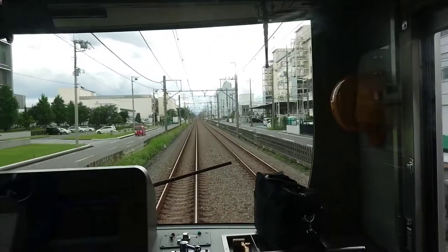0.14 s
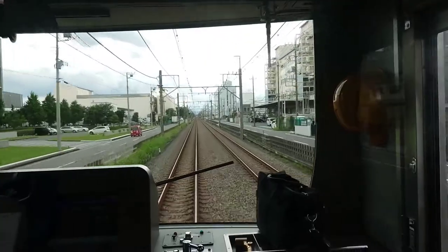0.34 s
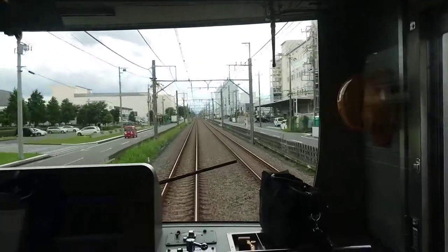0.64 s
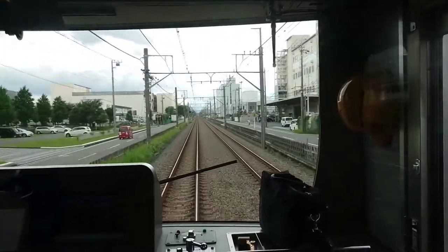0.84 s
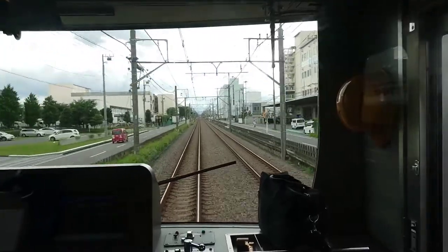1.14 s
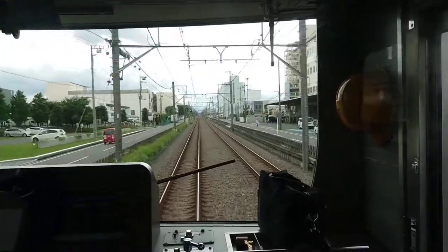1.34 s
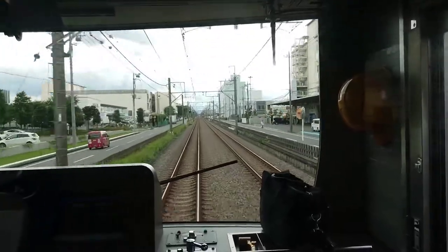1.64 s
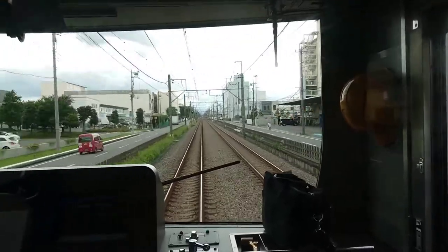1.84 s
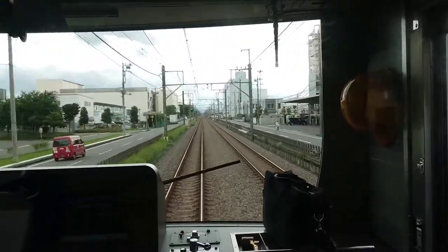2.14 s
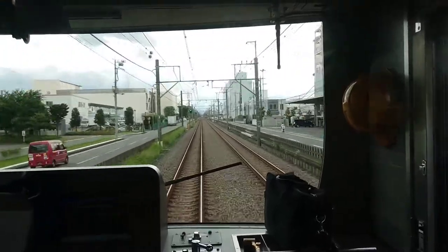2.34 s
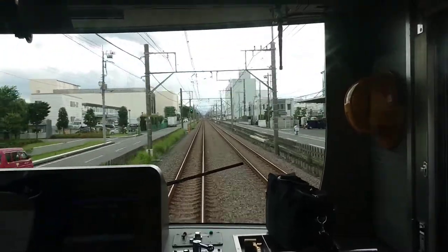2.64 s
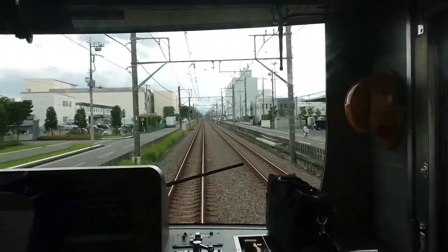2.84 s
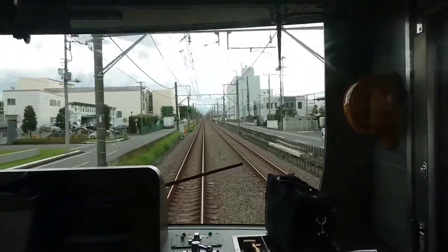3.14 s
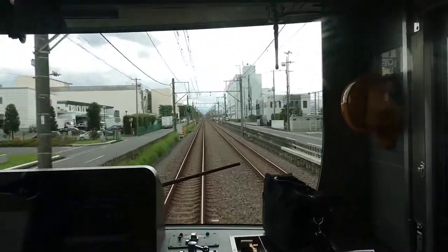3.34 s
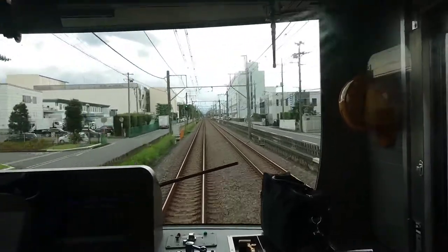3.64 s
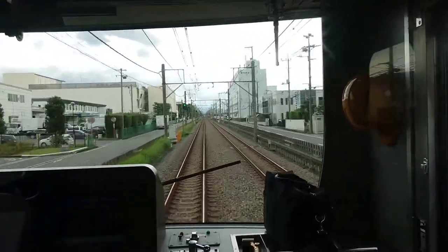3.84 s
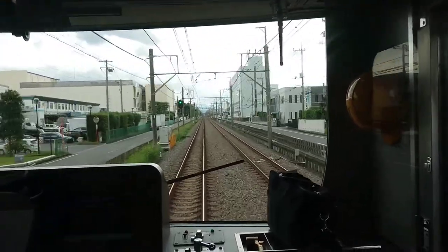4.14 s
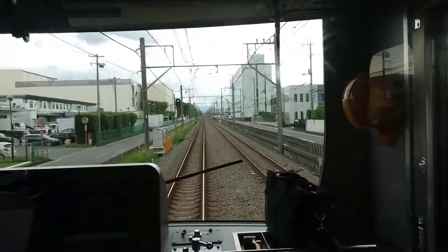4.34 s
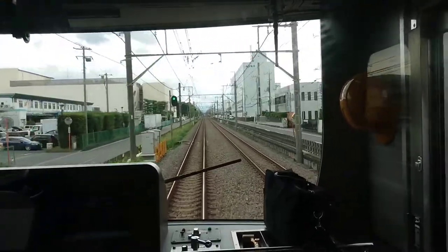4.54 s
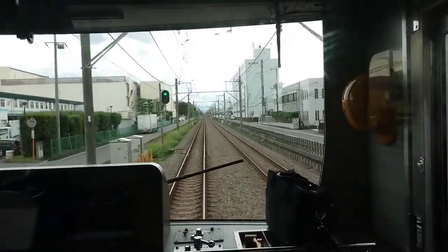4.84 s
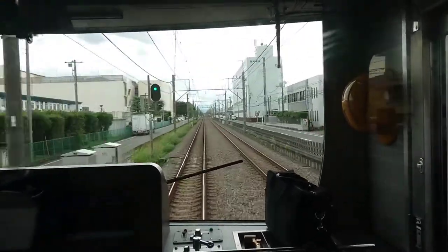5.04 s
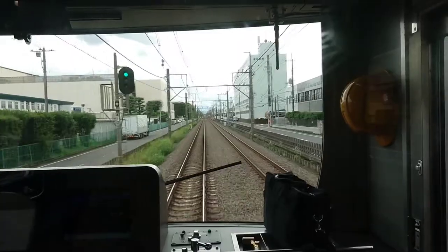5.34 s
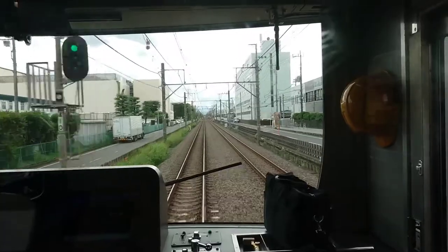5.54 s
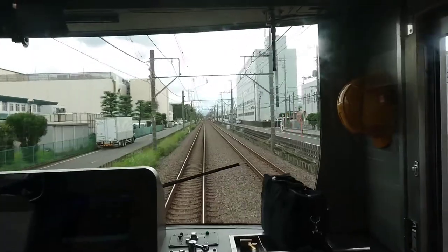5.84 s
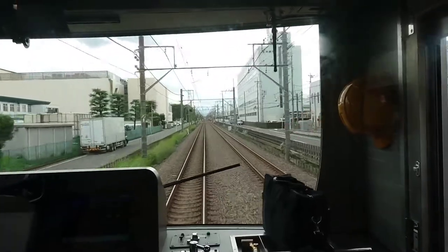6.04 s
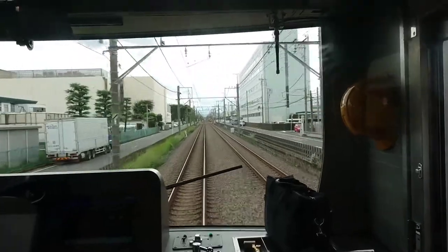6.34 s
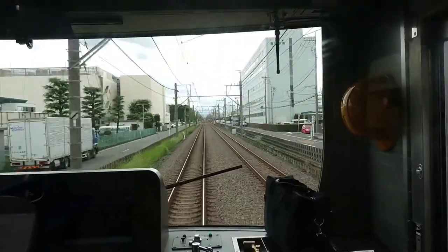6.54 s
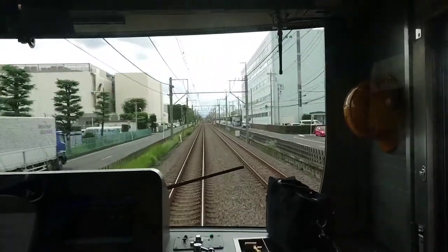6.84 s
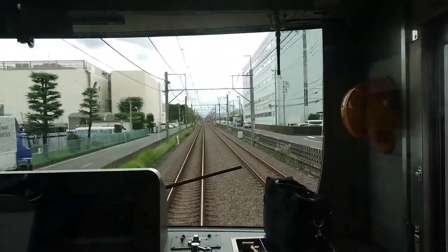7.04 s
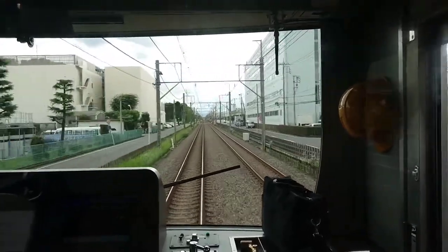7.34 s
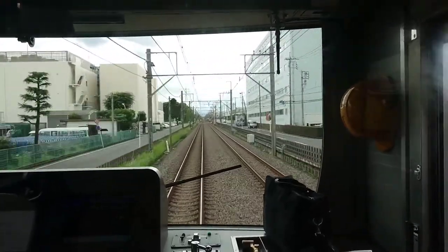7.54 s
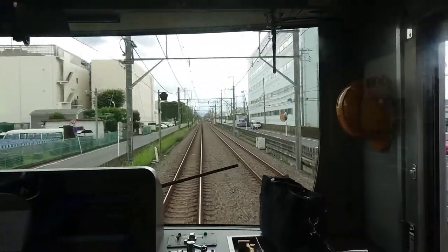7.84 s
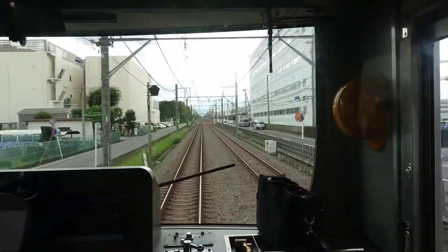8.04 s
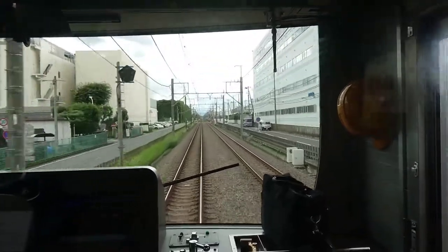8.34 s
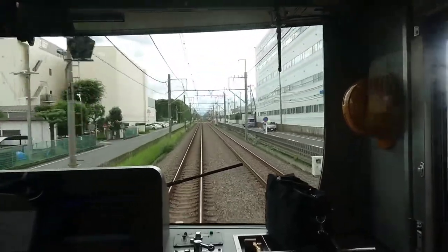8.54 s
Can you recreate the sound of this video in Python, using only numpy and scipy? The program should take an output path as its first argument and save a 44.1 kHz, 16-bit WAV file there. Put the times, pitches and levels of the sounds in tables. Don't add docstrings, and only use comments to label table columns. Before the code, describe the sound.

Low rumbling train ride heard from the driver's cab: floor thumps, a hard clattering jolt early on, thin whine and tiny squeaks behind.

```python
import sys
import numpy as np
from scipy import signal
from scipy.fft import rfft, irfft
from scipy.io import wavfile
from scipy.ndimage import uniform_filter1d

SR = 44100
rng = np.random.default_rng(int(sys.argv[2]) if len(sys.argv) > 2 else 0)


def volts_from_db(level):
    exponent = np.asarray(level, float) / 20
    return 10 ** exponent


def persist_wave(psi):
    counts = np.round(np.clip(psi, -1, 1) * 32767).astype(np.int16)
    wavfile.write(sys.argv[1], SR, np.atleast_2d(counts).T)


N = 382788
HZ = np.maximum(np.fft.rfftfreq(N, 1 / SR), 1)


def rms_one(x):
    return x / np.sqrt(np.mean(x ** 2) + 1e-20)


def in_time(rows):
    s, *columns = np.transpose(rows)
    return np.array([np.interp(np.arange(N) / SR, s, c) for c in columns])


def at_hz(points):
    hz, value = np.transpose(points)
    return np.interp(np.log(HZ), np.log(hz), value)


def hump(hz, width):
    return 1 / (1 + (2 * (HZ - hz) / width) ** 2)


def drift(rate):
    r = np.exp(-80 * np.pi * rate / SR)
    sparse = rng.standard_normal(N // 40 + 2002)
    slow = signal.lfilter([1], [1, -2 * r, r * r], sparse)[2000:]
    return np.interp(np.arange(N) / 40, np.arange(len(slow)), rms_one(slow))


def evened(x, span_s, share):
    power = uniform_filter1d(np.mean(x ** 2, axis=0), round(span_s * SR), mode="wrap")
    return x * (power / np.mean(power) + 0.039) ** (-np.clip(share, 0, 1) / 2)


def swells(rest_db, s, peak_db, length_s):
    t = np.arange(0, N + 64, 64) / SR
    length_s = np.reshape(length_s, (-1, 1))
    bells = volts_from_db(peak_db) ** 2 @ np.exp(-8 * ((t - s[:, None]) / length_s) ** 2)
    return 10 * np.log10(volts_from_db(rest_db) ** 2 + np.interp(np.arange(N) / SR, t, bells))


def add(power, s, db, t60, rise_s):
    start = round(s * SR)
    t = np.arange(min(SR, N - start)) / SR
    power[start:][:len(t)] += (volts_from_db(db - 60 * t / t60) * (1 - np.exp(-t / rise_s))) ** 2


# frequency in Hz, left-right correlation.
LIKENESS = [(25, .985), (50, 1), (130, 0.98), (210, 0.96), (330, 0.81), (500, 0.56), (770, 0.6),
            (1170, 0.15), (1790, -0.31), (2700, -0.012), (4000, -0.049)]


def diffuse():
    mid, side = rfft(rng.standard_normal((2, N)))
    alike = np.clip(at_hz(LIKENESS), -1, 1)
    return np.sqrt(1 + alike) * mid + np.sqrt(1 - alike) * side * np.array([[1], [-1]])


ZONE_HZ = [
    75,
    260,
    750,
    2500,
]
# frequency in Hz, level in dB per Hz.
ROLLING = [(20, -30), (32, -15.5), (48, -3), (65, 0.5), (99, -3.5), (172, -14.5), (282, -17.5),
           (434, -25.5), (533, -24.5), (668, -30), (1010, -31), (1520, -34.5), (2340, -35.5), (3200, -38.5),
           (10000, -41.5), (16000, -49.5)]
# frequency in Hz, width in Hz, lift in dB.
FLOOR_MODES = [(64.6, 13.6, 3.5), (144, 21, 2.5), (211, 30, 2.5), (256, 20, 2.5), (280.4, 16.4, 3.5),
               (350, 14, 2)]


def rolling(patchy_db):
    loads = body_loads()
    loads = loads - np.median(loads, axis=1, keepdims=True)
    slow = uniform_filter1d(loads, round(.3 * SR), axis=1)
    modes_db = sum(lift_db * hump(hz, width) for hz, width, lift_db in FLOOR_MODES)
    field = diffuse() * volts_from_db(at_hz(ROLLING) + modes_db)
    field = field / np.sqrt(np.mean(irfft(field, N) ** 2))
    out, together = 0, drift(9)
    octaves = np.log2(np.clip(HZ, 45, 11520))
    for hz in 45 * 2 ** np.arange(0, 8.1, 2 / 3):
        slice_shape = np.clip(1 - 1.5 * np.abs(octaves - np.log2(hz)), 0, 1)
        piece = irfft(field * slice_shape, N)
        if hz < 400:
            piece = evened(piece, span_s=0.06, share=0.26)
        shares = np.array([np.interp(np.log(hz), np.log(ZONE_HZ), row) for row in np.eye(4)])
        reach = shares.max() ** 2.3 * min(hz / 70, 1) ** 2
        surge_db = reach * (shares @ loads - shares @ slow)
        flutter_db = patchy_db * (drift(9.5) + .5 * together)
        slow_db = min(hz / 60, 1) ** 2 * shares @ slow
        out = out + volts_from_db(slow_db + surge_db + flutter_db) * piece
    return volts_from_db(-19.5) * out


# time in seconds, rail roughness in dB, sway of the car on its springs in dB.
TRACK = [(0, -41, 1), (.36, -37, -1), (.58, -42.5, 0.5), (1.06, -40.5, -0.5), (1.4, -37.5, -0.5),
         (1.84, -40, -1), (2.47, -36, -2), (3.22, -39.5, 3.5), (3.55, -40.5, 3), (3.89, -33.5, 4),
         (4.3, -40, 3), (5.49, -40.5, 1.5), (5.95, -41.5, -1), (6.5, -43, -1.5), (7.6, -43.5, -1.5),
         (8.0, -43, 2), (8.34, -41, 0.5), (8.68, -45, -1)]


def roughness():
    db = in_time(TRACK)[0]
    return db - np.median(db)


FOLLOWS = [
    0.34,
    0.75,
    0.43,
    0.87,
]
SWAYS = [
    1.13,
    0.15,
    0.18,
    .05,
]
# time in seconds, peak in dB, length in seconds.
BOUNCES = [(0.0, -14.5, 0.052), (0.255, -18.5, 0.16), (0.514, -18, 0.16), (0.96, -16.5, 0.13),
           (1.158, -18, 0.096), (1.256, -18, 0.077), (1.37, -21, 0.07), (1.515, -22, 0.077),
           (1.81, -22.5, 0.11), (2.006, -18.5, 0.1), (2.223, -18.5, 0.056), (2.45, -21, .1),
           (2.52, -19, 0.11), (2.727, -18, 0.046), (2.957, -24, 0.43), (3.595, -25, 0.18), (3.82, -29, .18),
           (3.935, -17, 0.084), (4.14, -14.5, 0.079), (4.372, -17.5, 0.19), (4.828, -25, 0.15),
           (4.98, -12, 0.033), (5.39, -11, 0.058), (6.043, -19, 0.12), (5.547, -25, 0.12),
           (6.404, -19, 0.14), (6.826, -20, 0.23), (7.24, -24, 0.64), (8.147, -18.5, 0.098),
           (8.587, -18, 0.13)]
# time in seconds, peak in dB.
FLEXES = [(.02, -23), (.3, -40), (.46, -24), (.8, -25), (1.06, -28), (1.24, -21.5), (1.37, -27),
          (1.47, -28), (1.57, -26), (1.681, -26), (1.93, -36), (2.43, -20.5), (2.54, -24), (2.73, -34),
          (2.87, -22.5), (2.95, -21.5), (3.45, -30), (3.84, -28), (3.97, -24), (3.58, -31), (4.27, -34),
          (4.5, -28), (4.81, -30), (5.27, -26), (5.52, -25.5), (5.608, -28), (5.78, -27.5), (6.26, -32.5),
          (7.88, -39.5), (8.05, -26)]


def body_loads():
    sway = in_time(TRACK)[1]
    boom, drone, roar, hiss = np.outer(FOLLOWS, roughness()) + np.outer(SWAYS, sway)
    boom = swells(-26 + boom, *np.transpose(BOUNCES))
    drone = swells(-31.5 + drone, *np.transpose(FLEXES), length_s=0.072)
    return np.array([boom, drone, roar, hiss])


# time in seconds, peak in dB, pitch in Hz.
FLOOR_THUMPS = [(.932, -15, 70), (1.15, -14, 62), (1.235, -9, 82), (1.337, -15, 88), (2.48, -10, 86),
                (2.68, -11, 61), (2.822, -15, 64), (3.899, -11, 76), (4.116, -9, 59.6), (4.34, -11, 72),
                (4.788, -14, 73), (4.968, -13, 70), (5.36, -6, 61), (6.36, -14, 75), (6.74, -14, 58),
                (6.84, -15, 58), (7.311, -12, 60), (8.146, -14, 56), (8.557, -12, 66)]
# time in seconds, peak in dB, pitch in Hz.
FRAME_KNOCKS = [(0.085, -24, 228), (0.357, -19, 213), (0.452, -12.5, 273), (0.53, -17, 245),
                (0.629, -18.5, 242), (0.77, -22, 267), (0.808, -17, 342), (0.935, -19.5, 283),
                (1.017, -17.5, 345), (1.13, -18, 248), (1.229, -22, 261), (1.307, -24, 262),
                (1.357, -22, 272), (1.474, -15, 270), (1.559, -22, 279), (1.665, -12, 277),
                (1.699, -20, 267), (2.06, -22, 230), (2.427, -14, 259), (2.514, -15, 274), (2.57, -19, 281),
                (2.858, -20, 215), (2.926, -17, 339), (3.779, -20.5, 224), (3.897, -24, 200),
                (3.948, -18, 220), (3.978, -18, 200), (4.308, -18, 231), (4.493, -21, 264),
                (4.56, -17, 293), (4.706, -23, 261), (5.329, -21.5, 283), (5.508, -18, 227),
                (5.735, -25, 261), (5.856, -21, 211), (7.205, -19.5, 242)]
# time in seconds, level in dB, pitch in Hz, t60 in seconds.
RINGS = [(2.440, -24, 818, 0.13), (2.439, -24, 1260, .12), (2.442, -27, 1782, .11), (2.438, -32, 4700, .1),
         (2.445, -36, 3200, .2), (2.465, -33, 2600, .15), (2.437, -36, 2500, 0.14), (2.437, -33, 3040, .14),
         (2.45, -37, 4100, .2), (2.44, -39, 4600, .15), (2.455, -31, 544, .16), (2.485, -29, 800, .12),
         (2.496, -30, 1390, .11), (2.518, -32, 1164, .1), (2.518, -34, 1771, .08), (2.518, -39, 2331, .15),
         (2.52, -37, 2783, .18), (2.53, -36, 3359, .15), (2.53, -37, 5250, .12), (2.625, -34, 2580, .08),
         (6.047, -29, 470, .1), (6.075, -34, 1000, .12), (6.08, -37, 2000, .1), (6.125, -34, 830, .13),
         (6.13, -33, 1020, .15), (6.135, -39, 1453, .14), (6.15, -38, 1050, .1), (6.17, -41, 2400, .25),
         (6.2, -36, 1000, .1), (6.315, -39, 2000, .12), (8.37, -40, 1980, .15), (8.375, -40, 1680, .1),
         (8.29, -40, 1750, .12), (8.31, -39, 2330, .12), (8.44, -41, 2500, .15), (9.1, -44, 2400, .2),
         (8.15, -42, 2450, .2), (8.24, -41, 2600, .15), (8.225, -41, 1750, .15), (8.3, -42, 2550, .15),
         (6.17, -39, 1400, .12), (6.21, -40, 2450, .25), (6.06, -39, 1500, .15)]


def rings(rise_s, twin_db, twin_ratio, spread):
    out, t = np.zeros((2, N + SR)), np.arange(SR // 3) / SR
    blows = list(RINGS)
    for s, db, hz in FRAME_KNOCKS:
        blows.append((s, db - 3.5, hz, .13))
        blows.append((s, db - 3.5 - 5.5, hz * 1.25, .13))
    for s, db, hz in FLOOR_THUMPS:
        blows.append((s, db + 1.5, hz, .45))
    for s, db, hz, t60 in blows:
        start, twin, apart = rng.uniform(0, 2 * np.pi, 3)
        out_of_step = spread * min(hz / 1500, 1) * np.sin(apart) * np.array([[1], [-1]])
        phase = 2 * np.pi * hz * t + out_of_step
        tone = np.sin(phase + start) + volts_from_db(twin_db) * np.sin(twin_ratio * phase + twin)
        rise = 1 - np.exp(-t / (rise_s + 0.99 / hz))
        out[:, round(s * SR):][:, :len(t)] += volts_from_db(db - 60 * t / t60) * rise * tone
    return out[:, :N]


# time in seconds, level in dB, t60 in seconds, centre in Hz, width in Hz.
THUDS = [(2.462, -18, 0.22, 238, 100), (2.437, -32, .2, 1500, 1600), (2.518, -35, .2, 2500, 2500),
         (.2, -44, .9, 3500, 3000), (1.2, -45, 1.5, 3000, 2500), (1.45, -40, .7, 3400, 3400),
         (3.71, -40, 1.3, 3400, 3400), (3.89, -40, 1.1, 2800, 3000), (7.1, -47, 0.87, 2800, 2000),
         (2.5, -30.5, .3, 900, 600), (2.86, -33.5, 0.4, 446, 300), (2.9, -31, .25, 700, 400),
         (3.96, -24, 0.37, 334, 150), (6.046, -31, 0.76, 550, 400), (6.052, -38, 0.67, 1690, 1200),
         (6.11, -45, 1.1, 1420, 200), (6.12, -35, 0.72, 875, 350), (6.17, -43, .7, 2300, 1000),
         (6.25, -40, 0.52, 2150, 900), (8.05, -46.5, 0.9, 2200, 1200), (8.14, -41, 0.9, 2450, 500),
         (.26, -42, .7, 2600, 1600), (6.06, -38, .8, 1300, 1500), (8.23, -43, 0.8, 2700, 1400),
         (8.38, -44, 0.68, 2100, 900), (8.22, -44, 0.78, 1730, 300)]
# time in seconds, level in dB.
TICKS = [(.522, -18), (.817, -19), (2.735, -21), (2.812, -18), (4.485, -17), (7.985, -21)]


def thuds(rise_s):
    out = np.zeros((2, N))
    ticks = [(s, db, .12, 15400, 500) for s, db in TICKS]
    for s, db, t60, hz, width in [*THUDS, *ticks]:
        power = np.zeros(N)
        add(power, s, db, t60, rise_s)
        shared, left, right = rng.standard_normal((3, SR))
        noise = np.array([left, right]) * min(hz / 1200, 1) + shared
        band = signal.butter(2, [hz - width / 2, hz + width / 2], "band", fs=SR, output="sos")
        burst = rms_one(evened(signal.sosfilt(band, noise), span_s=0.013, share=.6))
        start = round(s * SR)
        span = slice(start, min(start + SR, N))
        out[:, span] += np.sqrt(power[span]) * burst[:, :span.stop - start]
    return out


# time in seconds, rattle in dB, knock in dB above it, t60 in seconds.
JOLTS = [(0.4453, -35, -40, 0.18), (0.5184, -38, -5, 0.45), (0.7397, -36, -4, 0.19),
         (0.8255, -33.5, -9, 0.17), (0.9014, -38, -1, 0.3), (0.9906, -41, 3.5, 0.2),
         (1.4391, -32.5, -7, 0.27), (1.4794, -38.5, 5, 0.22), (2.4335, -25.5, -2.5, 0.44),
         (2.4874, -27.5, -4, 0.31), (2.5194, -28, 0, 0.13), (2.6284, -31.5, 2.5, 0.049),
         (2.745, -29.5, -21, 0.1), (2.826, -35, -6, 0.29), (2.892, -36, 5, 0.23), (2.9657, -37, -5, 0.53),
         (3.7364, -40, 7, 0.25), (3.7944, -31.5, -3, 0.26), (3.8334, -34, -4, 0.18), (3.8974, -42, 6, 0.23),
         (4.481, -34.5, -7, 0.26), (4.5435, -38.5, 2, 0.22), (4.5785, -38.5, 0, 0.17),
         (4.7294, -44, -16, 0.37), (5.3083, -37.5, -9, 0.3), (6.1214, -38, -3, 0.16),
         (6.448, -38, -12, 0.25), (6.5954, -37.5, -16, 0.21), (7.9962, -35, -11, 0.14),
         (8.3444, -39.5, -4, 0.32)]
# time in seconds, knock in dB.
NUDGES = [(1.2665, -36), (1.6894, -37), (1.7908, -42), (2.098, -38), (3.1044, -43), (3.5049, -37.5),
          (3.6975, -40), (4.2994, -35.5), (4.37, -46), (4.43, -40), (5.47, -47), (5.55, -37), (5.65, -41),
          (5.256, -41), (7.1094, -44), (7.1594, -40), (7.6505, -45), (8.3873, -38.5)]
# frequency in Hz, level in dB per Hz.
RATTLE = [(1500, -19), (2500, -23), (4000, -22), (6000, 2), (9000, 11), (12000, -1.5), (14200, 12),
          (15200, 0.5)]
KNOCK = [(150, -21), (300, 14.5), (600, 8), (1200, -0.5), (2000, -8), (3500, 2), (6000, 2), (12000, -22)]
# frequency in Hz, width in Hz, lift in dB.
PANELS = [(550, 60, 0), (805, 64, 12.5), (1000, 180, -30), (1247, 78, 14), (1440, 68, 2), (1794, 180, 14),
          (2050, 100, 7), (2500, 130, 9), (3060, 91, 9), (4030, 120, 3.5), (5270, 120, 7)]


def jolts(rise_s, grain_db, knock_longer):
    rattle, knock, loose = np.zeros((3, N))
    loose += volts_from_db(-60 + .4 * roughness()) ** 2
    gentle = [(s, db - 7, 7, 0.2) for s, db in NUDGES]
    for s, db, knock_db, t60 in [*JOLTS, *gentle]:
        add(loose, s, db - 27.5, 1.7, rise_s)
        add(rattle, s, db + 9.5, t60, rise_s)
        add(knock, s, db + 3.5 + knock_db, knock_longer * t60, rise_s)
    grain = volts_from_db(grain_db * drift(250))
    bright = rms_one(irfft(diffuse() * volts_from_db(at_hz(RATTLE)), N)) * grain
    panels_db = sum(lift_db * hump(hz, width) for hz, width, lift_db in PANELS)
    dull = rms_one(irfft(diffuse() * volts_from_db(at_hz(KNOCK) + panels_db), N))
    buzz = signal.sosfilt(signal.butter(2, 11100, fs=SR, output="sos"), bright)
    return np.sqrt(rattle) * bright + volts_from_db(21.5) * np.sqrt(loose) * buzz + np.sqrt(knock) * dull


# frequency in Hz, width in Hz, level in dB.
GEAR_MESH = [
    (1101, 30, -3),
    (1154.6, 29, -2.5),
]
# time in seconds, length in seconds, lower mesh in dB, upper mesh in dB.
MESHING = [(0, 0.16, -47, -46), (.4, 0.64, -46.5, -49), (.8, 0.53, -50, -52), (1.18, 0.45, -64, -44.5),
           (2.49, .15, -55, -41), (3.04, 0.98, -57, -48), (3.8, 0.33, -60, -43), (4.47, .2, -44, -48),
           (4.87, .15, -52, -46), (5.917, 0.097, -43, -41), (6.437, 0.07, -51, -46),
           (6.68, 0.07, -42, -39.5), (6.792, .08, -58, -41), (7.255, .1, -56, -44), (7.39, .12, -44.5, -48),
           (7.51, .08, -47, -53), (7.63, .08, -49, -56), (7.785, 0.063, -41, -44), (7.85, .08, -44, -50),
           (7.92, .2, -47, -46), (8.07, 0.12, -49, -49), (8.2, 0.08, -47, -49), (8.35, .2, -48, -54),
           (8.53, .1, -52, -50), (8.63, 0.12, -52, -49)]


def whine():
    out, field = 0, diffuse()
    s, length_s, *peaks_db = np.transpose(MESHING)
    for (hz, width, db), peak_db in zip(GEAR_MESH, peaks_db):
        load_db = swells(-53.5, s, peak_db, length_s)
        tone = evened(irfft(field * hump(hz, width), N), span_s=0.038, share=0.92)
        out = out + volts_from_db(load_db + db) * rms_one(tone)
    return out


# time in seconds, pitch in Hz, level in dB.
SINGING = [(7.75, 1100, -45), (7.87, 1105, -47), (8.05, 1100, -45), (8.09, 1135, -45), (8.16, 1110, -52),
           (8.19, 1100, -46), (8.4, 1108, -48), (8.54, 1140, -44), (8.68, 1142, -45)]


def singing(waver_hz, waver_db, rise_s):
    hz, db = in_time(SINGING)
    on = np.clip((np.arange(N) / SR - SINGING[0][0]) / rise_s, 0, 1)
    phase = 2 * np.pi * np.cumsum(hz + waver_hz * drift(24.9)) / SR
    level = volts_from_db(db + 1 + waver_db * drift(14))
    return on * level * np.sin(phase + np.array([[-.4], [.4]]))


# start in seconds, length in seconds, pitch in Hz, level in dB.
SQUEAKS = [
    (5.415, 0.12, 9300, -34),
    (5.7, 0.091, 9350, -45),
    (7.774, 0.13, 9260, -38),
]


def squeaks():
    out, t = np.zeros(N), np.arange(N) / SR
    wobble, rough = drift(31), volts_from_db(3 * drift(60))
    for s, length, hz, db in SQUEAKS:
        shape = np.sqrt(np.sin(np.pi * np.clip((t - s) / length, 0, 1)) + 1e-12)
        phase = 2 * np.pi * np.cumsum(hz + 70 * wobble) / SR
        out += volts_from_db(db) * shape * rough * np.sin(phase)
    return out * volts_from_db([[0], [-3]])


def scene():
    body = rolling(patchy_db=0.94)
    struck = rings(rise_s=.002, twin_db=-6.5, twin_ratio=1.04, spread=1.45) + thuds(rise_s=0.0082)
    shaken = jolts(rise_s=0.0023, grain_db=-1.5, knock_longer=1.36)
    gears = whine() + singing(waver_hz=16.0, waver_db=2.5, rise_s=.03)
    return body + struck + shaken + gears + squeaks()


def top_cut(x):
    return signal.sosfilt(signal.butter(12, 15700, fs=SR, output="sos"), x)


# frequency in Hz, gain in dB.
LEFT_PORT = [(200, -0.78), (2500, 2), (4000, -3), (5000, -8), (6000, -13.5), (7000, -31), (7500, -24.5),
             (8700, -31), (9300, -22.5), (10000, -17), (12000, -16.5), (14000, -24.5), (14800, -33)]
RIGHT_PORT = [(200, -1.16), (2500, 1.5), (4000, -3), (5000, -4), (6000, -8.5), (6800, -13.5), (7500, -26.5),
              (8600, -27.5), (9100, -39), (9600, -31), (11000, -16.5), (14000, -25), (14800, -34)]


def record(dry):
    ports = irfft(volts_from_db([at_hz(LEFT_PORT), at_hz(RIGHT_PORT)]), N)
    taps = np.roll(ports, 512, axis=1)[:, :1025] * np.hanning(1025)
    padded = np.pad(dry, ((0, 0), (512, 512)), "reflect")
    heard = signal.oaconvolve(padded, taps, "valid", axes=1)
    mix = .8 * np.tanh(heard / .8)
    return top_cut(mix)


dry = scene()
out = record(dry)
persist_wave(out)
```